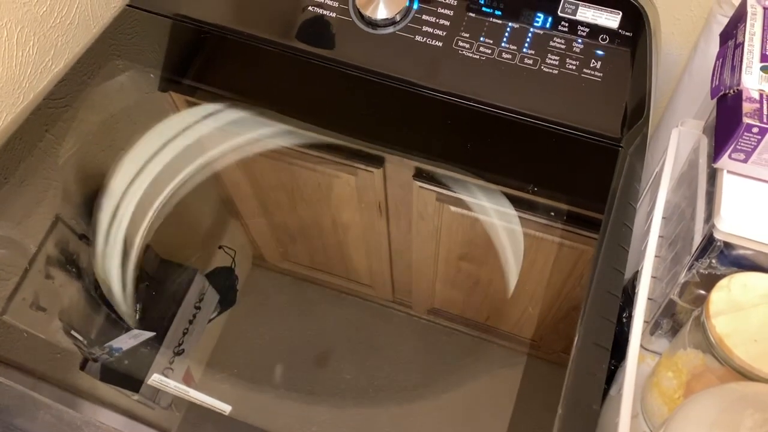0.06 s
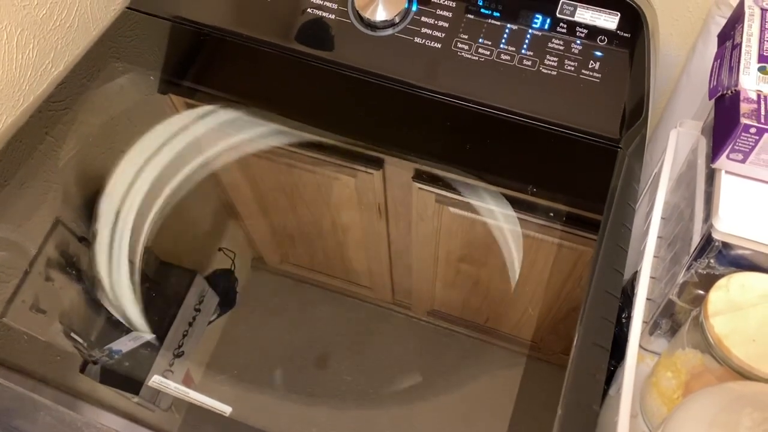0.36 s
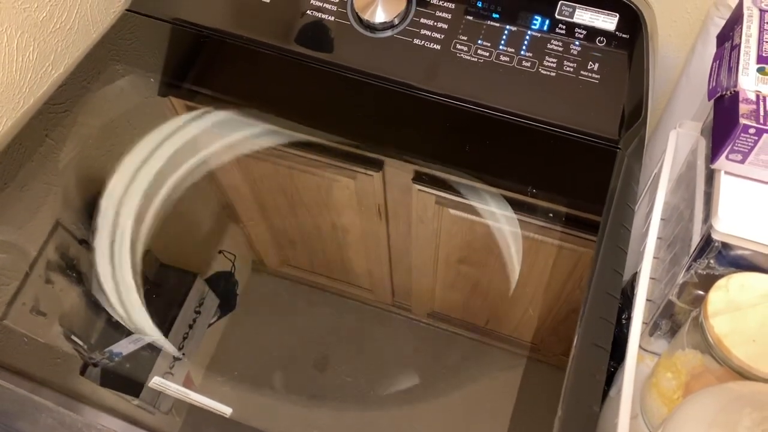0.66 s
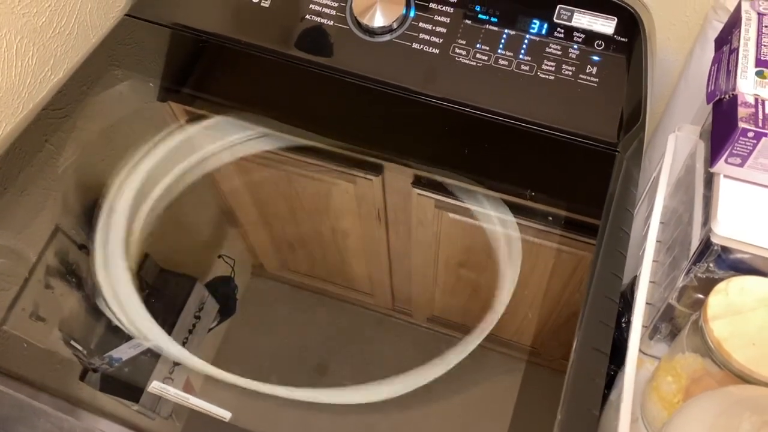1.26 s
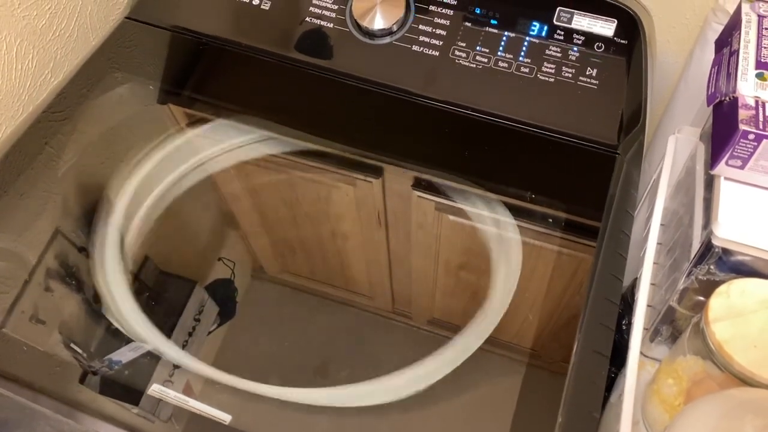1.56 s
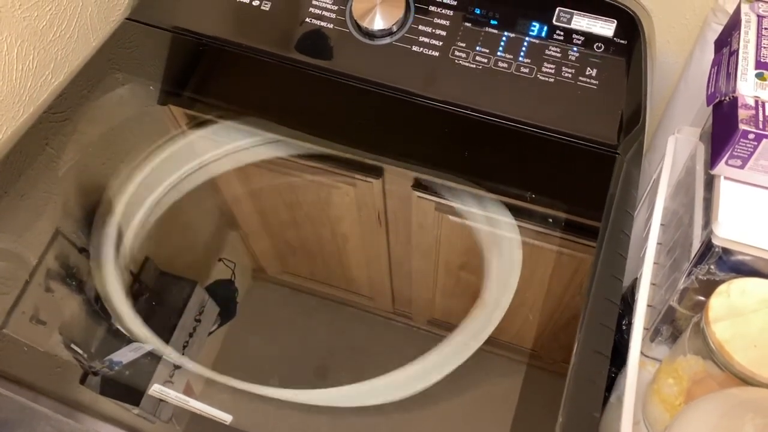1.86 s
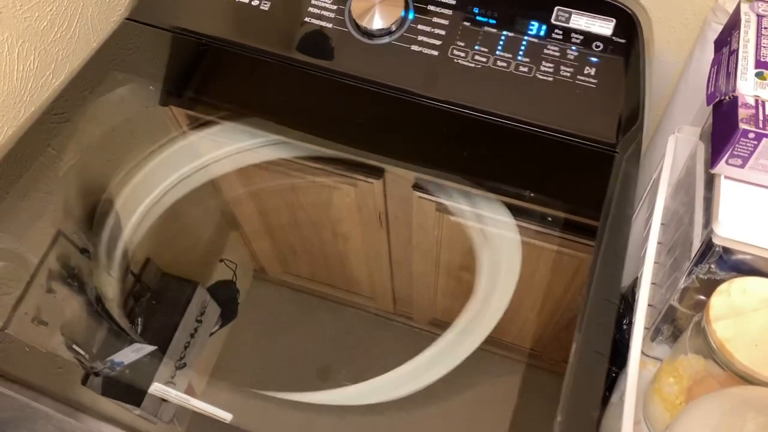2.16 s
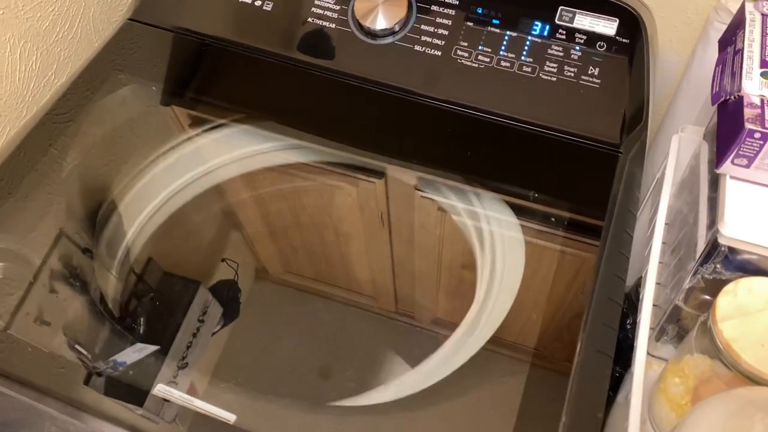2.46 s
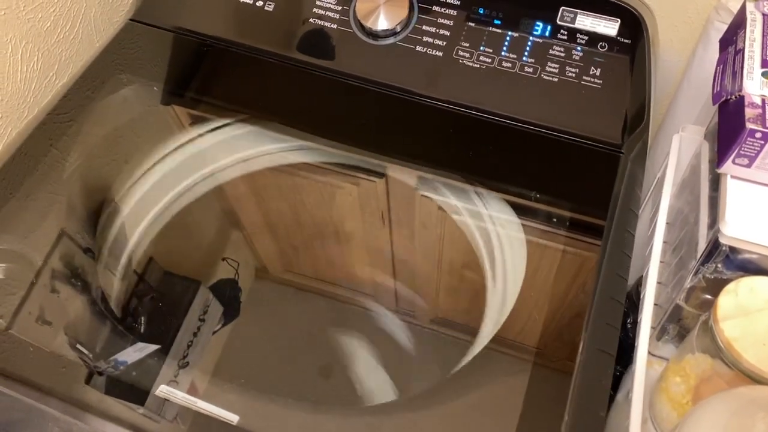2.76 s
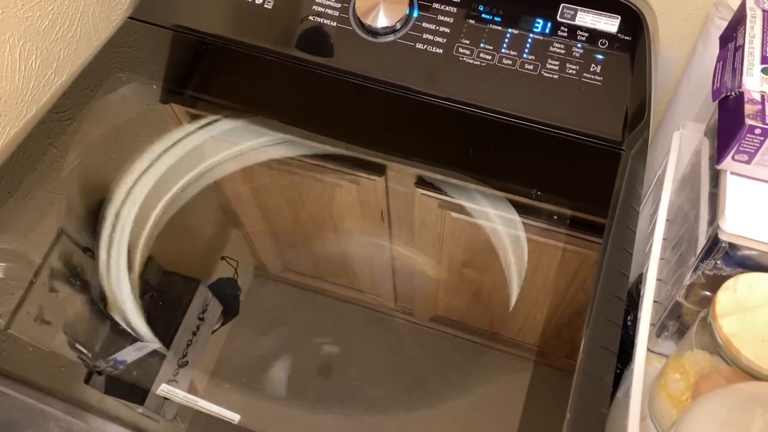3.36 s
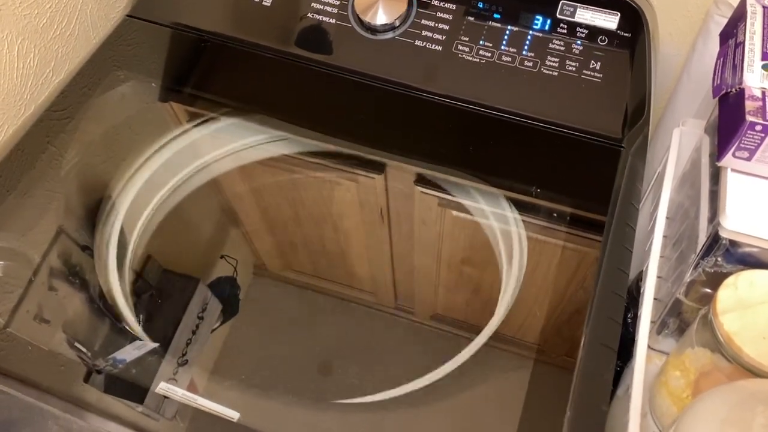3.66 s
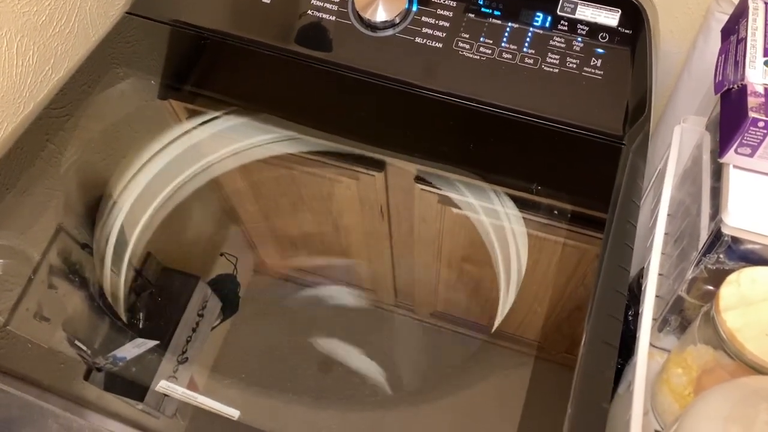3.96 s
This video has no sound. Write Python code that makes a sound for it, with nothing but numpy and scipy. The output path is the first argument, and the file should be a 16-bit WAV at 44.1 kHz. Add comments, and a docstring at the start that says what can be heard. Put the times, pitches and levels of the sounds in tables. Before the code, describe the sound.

A washing machine spins off balance, its tub knocking against the metal cabinet about three times a second. Soft swishes, rattles, rumble and motor hum run underneath. Heard close in a small room, the knocking peaks halfway, then dies down.

```python
"""A top-loading washer spinning off balance in a small room, close to a stereo microphone.
About three times a second the tub clacks against the steel cabinet, whose panels clatter and boom,
and then swishes past. Loose parts rattle, the suspension bumps and rumbles, and the motor hums
underneath. The knocking peaks halfway, then dies down."""
import sys
import numpy as np
from scipy.fft import rfft, irfft, next_fast_len
from scipy.io import wavfile
from scipy.ndimage import map_coordinates

SR = 44100
rng = np.random.default_rng(int(sys.argv[2]) if len(sys.argv) > 2 else 0)


def file_out(sig):
    """Save sig as 16-bit WAV at sys.argv[1]."""
    # one column per channel
    cols = np.atleast_2d(sig).T
    # limit, then scale
    lim = np.clip(cols, -1, 1)
    pcm = np.round(lim * 32767).astype(np.int16)
    wavfile.write(sys.argv[1], SR, pcm)


N = 176400

# envelopes of a blow: (attack/s, hold/s, t60/s, room tail/dB)
CLACK_ENV, RIM_ENV = (.0015, .014, .1, -18), (.002, .016, .12, -16)
CLATTER_ENV, RATTLE_ENV = (.0025, .017, .2, -13), (.002, .014, .12, -17)
THUD_ENV = (.004, .035, .32, -11)
CLACK_DB, RIM_DB, CLATTER_DB, PANEL_DB, THUD_DB, BOOM_DB = -10.5, -8.3, -3.3, -10.5, -3, 3.2
PANEL_WIDTH_HZ = 26

# spectra of a knock's hard clack, bright edge and low thud: (f/Hz, level/dB)
CLACK_SPECTRUM = [(1200, -18), (2400, -6), (3700, 0), (4400, -3), (5200, -11), (6500, -15), (8500, -39)]
EDGE_SPECTRUM = [(3000, -12), (6300, 0), (7600, -3), (10600, -20), (11600, -48)]
THUD_SPECTRUM = [(70, -5), (130, 0), (220, -4), (370, 0), (540, -14), (1000, -36)]
# resonances of the steel panels: (f/Hz, level/dB)
PANEL_MODES = [(880, -7), (1090, -6), (1160, -1), (1455, -4), (1550, -3), (1780, -4)]
# tub strikes, before the mix gains: (t/s, clack/dB, clatter/dB, boom/dB, edge/dB, struck spot f/Hz)
TUB_STRIKES = [(0.0474, -25, -31, -31, -49, 1600), (0.1074, -29, -30, -23, -42, 1200),
               (0.3704, -26, -33, -31, -51, 1830), (0.4224, -32, -31, -26, -54, 1150),
               (0.6934, -32, -38, -37, -58, 1850), (0.7357, -39, -36, -32, -55, 1130),
               (1.0144, -29, -34, -36, -58, 1600), (1.3468, -30, -32, -36, -57, 1750),
               (1.6551, -29, -31, -27, -44, 1900), (1.6754, -21, -25, -26, -43, 1800),
               (1.7134, -30, -28, -27, -47, 1400), (1.9614, -32, -28, -29, -47, 1850),
               (2.0034, -32, -32, -29, -47, 1300), (2.0434, -35, -32, -26, -49, 1000),
               (2.3311, -22, -25, -24, -47, 1600), (2.3764, -29, -27, -23, -46, 1350),
               (2.6713, -27, -32, -27, -45, 2300), (2.7354, -29, -29, -27, -47, 1200),
               (3.0164, -27, -34, -33, -54, 2020), (3.3548, -49, -40, -34, -65, 900),
               (3.3842, -33, -37, -35, -58, 2100)]
def knocks():
    """The tub chatters against the cabinet: it clacks and clatters, and the panels ring and thud."""
    times, clack_db, clatter_db, boom_db, edge_db, spot_hz = np.transpose(TUB_STRIKES)
    chatter = amp(1.6 * wobble(260))
    clack = strikes(times, clack_db + CLACK_DB, CLACK_ENV) * noise(CLACK_SPECTRUM)
    ring = rim(times, clack_db + RIM_DB)
    clatter = sheet_steel(times, clatter_db + CLATTER_DB, spot_hz, CLATTER_ENV)
    panels = strikes(times, boom_db + PANEL_DB, CLATTER_ENV) * ringing(PANEL_MODES, PANEL_WIDTH_HZ)
    edge = strikes(times, edge_db, CLACK_ENV) * noise(EDGE_SPECTRUM)
    edge *= amp([[-1.5], [1.5]])  # right of centre
    thud = strikes(times, boom_db + THUD_DB, THUD_ENV) * noise(THUD_SPECTRUM)
    return chatter * (clack + ring + clatter + panels + edge) + thud


# resonances of the tub rim: (f/Hz, level/dB)
RIM_MODES = [(2950, -9), (3225, 0), (3405, 0), (3620, -1), (4150, -5)]
def rim(times, levels, width_hz=95, detune=.012, scatter_db=3.5):
    """The rim rings with a new mix of its resonances at every contact."""
    t, envelope = blow(RIM_ENV)
    out = np.zeros((2, N))
    for s, db in zip(times, levels):
        peaks = [(hz * rng.normal(1, detune), rng.normal(level, scatter_db)) for hz, level in RIM_MODES]
        add(out, s + t[0], amp(db) * envelope * ringing(peaks, width_hz, len(t)))
    return out


# broad clatter of sheet steel: (f/Hz, level/dB)
CLATTER_SPECTRUM = [(300, -7), (660, 6), (1100, -4), (2300, -1), (3200, -9), (12000, -49)]
def sheet_steel(times, levels, pitches, shape, width_hz=440, broad_db=-9.5):
    """Each blow lands on another spot of the steel, which clatters around its own hollow pitch."""
    t, envelope = blow(shape)
    out = np.zeros((2, N))
    broad = lambda hz: amp(broad_db + along(CLATTER_SPECTRUM, hz))
    for s, db, pitch in zip(times, levels, pitches):
        colour = lambda hz: np.hypot(resonant([(pitch, 0)], width_hz, hz), broad(hz))
        add(out, s + t[0], amp(db) * envelope * diffuse(colour, len(t)))
    return out


# low modes of the cabinet: (f/Hz, level/dB, t60/s)
CABINET_MODES = [(153, -8, .55), (281, -8, .4), (295, 0, .65), (332, -9, .35), (422, -6, .45),
                 (549, -19, .35)]
def cabinet(attack_s=.01):
    """Every knock sets the steel cabinet booming."""
    out, t = np.zeros(N), np.arange(SR) / SR
    modes = np.array([amp(db - 60 * t / t60) * np.exp(2j * np.pi * hz * t)
                      for hz, db, t60 in CABINET_MODES])
    modes *= 1 - np.exp(-t / attack_s)
    for s, _, _, boom_db, _, _ in TUB_STRIKES:
        phases = np.exp(2j * np.pi * rng.random((len(modes), 1)))
        add(out, s, amp(boom_db + BOOM_DB) * (phases * modes).real.sum(axis=0))
    return out


# jolts of the suspension: (t/s, relative level/dB, f/Hz)
JOLTS = [(1.652, -20, 225), (1.79, -24, 120), (1.961, -20, 232), (1.975, -20, 62), (2.04, -23, 120),
         (2.125, -18, 62), (2.735, -27, 150), (2.938, -27, 215), (2.97, -28, 305), (3.025, -24, 72),
         (3.08, -30, 150), (3.38, -32, 145), (3.50, -28, 55), (3.79, -43, 305)]
def bumps(attack_s=.007, t60_s=.2):
    """The swinging tub jolts its suspension: soft, quickly damped low notes."""
    out, t = np.zeros(N), np.arange(SR // 2) / SR
    envelope = (1 - np.exp(-t / attack_s)) * amp(6 - 60 * t / t60_s)
    for s, db, hz in JOLTS:
        add(out, s, amp(db) * envelope * np.sin(2 * np.pi * hz * t))
    return out


# light taps of loose parts: (t/s, level/dB, f/Hz)
TAPS = [(.560, -42, 1760), (.682, -40, 800), (1.004, -41, 700), (1.191, -45, 1900), (1.321, -39, 950),
        (1.83, -40, 1700), (2.14, -38, 1800), (2.302, -34, 1500), (2.63, -43, 1200), (3.455, -48, 1850),
        (3.674, -44, 900), (3.812, -53, 1700), (3.859, -50, 1300), (3.890, -51, 850)]
def rattles():
    """Loose parts tap the panels between the knocks, soft and hollow."""
    times, levels, pitches = np.transpose(TAPS)
    return sheet_steel(times, levels, pitches, RATTLE_ENV)


# hiss of the rubbing tub: (f/Hz, level/dB)
RUB_SPECTRUM = [(500, -8), (1600, 0), (6800, 0), (10500, -14), (13000, -34)]
# passes of the tub: (peak t/s, level/dB)
RUBS = [(.283, -51), (.62, -49), (.947, -50), (1.27, -50), (1.59, -56), (1.898, -50), (2.215, -49),
        (2.555, -60)]
def swishes(width_s=.024):
    """The tub rubs past once a turn: a soft hiss swells and fades."""
    t = np.arange(N) / SR
    swell = sum(amp(db) / np.cosh((t - s) / width_s) for s, db in RUBS)
    return swell * noise(RUB_SPECTRUM) * amp(1.2 * wobble(150))


# spectra of the spin's deep rumble, low drone and midrange churn: (f/Hz, level/dB)
RUMBLE_SPECTRUM = [(20, -31), (36, -12), (50, -1), (64, 1), (90, -6), (125, -12), (200, -30)]
DRONE_SPECTRUM = [(80, -13), (130, 3), (195, -6), (320, 1), (520, -14), (900, -35)]
CHURN_SPECTRUM = [(300, -3), (680, 0), (1000, -4), (1800, -3.5), (3400, -12), (4800, -23), (7000, -27),
                  (10500, -46)]
# course of the rumble: (t/s, level/dB)
RUMBLE_LEVELS = [(0, -26.5), (1.05, -34.5), (1.35, -31), (1.58, -35), (1.75, -28), (2.08, -24), (2.3, -30),
                 (2.85, -32), (3.1, -35), (3.27, -42), (3.5, -36), (3.72, -45), (3.85, -39), (4, -42)]
# course of the churn, which the drone follows: (t/s, level/dB)
CHURN_LEVELS = [(0, -43), (.7, -45), (1.15, -49), (1.55, -48), (2.2, -42), (2.6, -50), (3.0, -51),
                (3.25, -62), (3.55, -57), (4, -66)]
def spinning_tub(drone_above_db=9):
    """The spinning tub rumbles on its suspension, drones and churns."""
    rumble_db, = curves(RUMBLE_LEVELS)
    churn_db, = curves(CHURN_LEVELS)
    rumble = amp(rumble_db) * noise(RUMBLE_SPECTRUM)
    drone = amp(churn_db + drone_above_db) * noise(DRONE_SPECTRUM)
    churn_gain = amp(churn_db + 1.7 * wobble(60))
    churn = unit(noise(CHURN_SPECTRUM) + amp(-10) * ringing(PANEL_MODES, PANEL_WIDTH_HZ))
    return rumble + drone + churn_gain * churn


# course of the motor hum: (t/s, f/Hz, level/dB)
HUM_COURSE = [(0, 123, -39), (2.2, 117, -42), (3.3, 115, -56), (4, 112, -62)]
# its harmonics: (multiple, level/dB)
HUM_HARMONICS = [(1, -2), (2, 0), (3, -5), (4, -12)]
def motor():
    """The motor's slightly unsteady hum sags as the spin slows."""
    hz, level_db = curves(HUM_COURSE)
    phase = 2 * np.pi * np.cumsum(hz * (1 + .011 * wobble(12))) / SR
    return sum(amp(level_db + db + 2.5 * wobble(10)) * np.sin(k * phase) for k, db in HUM_HARMONICS)


# likeness of left and right at the microphone: (f/Hz, correlation)
COHERENCE = [(70, .999), (300, .94), (520, .42), (1200, .45), (4000, .06)]
def diffuse(gain, size=N):
    """Stereo noise of rms 1, coloured by gain(hz): alike in the bass, unrelated in the treble."""
    def response(hz):
        angle = np.arccos(along(COHERENCE, hz)) / 2
        return gain(hz) * np.array([np.cos(angle), np.sin(angle)])
    mid, side = filtered(rng.standard_normal((2, size)), response)
    return unit(np.array([mid + side, mid - side]))


def blow(shape, room_t60_s=.42, scrape_s=.012, scrape_db=-17):
    """Times and envelope of one blow: scraping lead-in, attack, hold, fast decay and the room's tail."""
    attack, hold, t60, tail_db = shape
    t = np.arange(-SR // 10, SR // 2) / SR
    after = np.maximum(t - hold, 0)
    rise = 1 - np.exp(-np.maximum(t, 0) / attack)
    direct = amp(-60 * after / t60)
    room = amp(tail_db - 60 * after / room_t60_s)
    scrape = amp(scrape_db) * np.exp(-abs(t) / scrape_s)
    return t, np.hypot(rise * np.hypot(direct, room), scrape)


def strikes(times, levels, shape):
    """Envelope of a row of blows, summed in power."""
    t, envelope = blow(shape)
    power = np.zeros(N)
    for s, db in zip(times, levels):
        add(power, s + t[0], (amp(db) * envelope) ** 2)
    return np.sqrt(power)


def noise(spectrum):
    """Broad noise that falls away at the top of its spectrum."""
    top_hz = spectrum[-1][0]
    return diffuse(lambda hz: amp(along(spectrum, hz)) / (1 + (hz / top_hz) ** 4))


def ringing(peaks, width_hz, size=N):
    """Narrow resonances, shaken at random."""
    return diffuse(lambda hz: resonant(peaks, width_hz, hz), size)


def resonant(peaks, width_hz, hz):
    """Gain of a set of (f/Hz, level/dB) resonances."""
    return np.sqrt(sum(amp(2 * db) / (1 + (2 * (hz - f) / width_hz) ** 2) ** 2 for f, db in peaks))


def amp(db):
    """Decibels to gain."""
    return 10 ** (np.asarray(db) / 20)


def unit(x):
    """Scale to rms 1."""
    return x / np.sqrt(np.mean(x ** 2) + 1e-20)


def along(points, hz):
    """Interpolate (f/Hz, value) points on a log axis."""
    f, values = np.transpose(points)
    return np.interp(np.log(hz + 1), np.log(f + 1), values)


def curves(rows):
    """One value per sample for each column after the time."""
    times, *columns = np.transpose(rows)
    return [np.interp(np.arange(N) / SR, times, column) for column in columns]


def wobble(rate):
    """A smooth random curve, rate knots a second."""
    return map_coordinates(rng.standard_normal(4096), [np.arange(N) * rate / SR], mode="wrap")


def filtered(x, response):
    """Filter x by the gain response(hz)."""
    size = x.shape[-1]
    padded = next_fast_len(size + 8192)
    hz = np.fft.rfftfreq(padded, 1 / SR)
    return irfft(rfft(x, padded) * response(hz), padded)[..., :size]


def add(track, s, sound):
    """Mix a sound in at time s."""
    start = round(s * SR)
    sound = sound[..., max(-start, 0):]
    part = track[..., max(start, 0):][..., :sound.shape[-1]]
    part += sound[..., :part.shape[-1]]


def scene():
    """The washer from close by, its boom and hum slightly to the right."""
    wide = knocks() + rattles() + swishes() + spinning_tub()
    boom_and_hum = (cabinet() + motor()) * amp([[-.7], [.7]])
    return wide + boom_and_hum + bumps()


def record(dry, top_hz=15200):
    """The recorder keeps nothing above its band limit."""
    return filtered(dry, lambda hz: hz < top_hz)


dry = scene()
out = record(dry)
file_out(out)
```